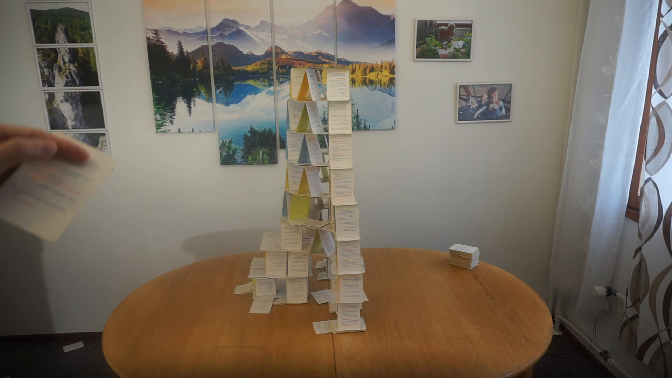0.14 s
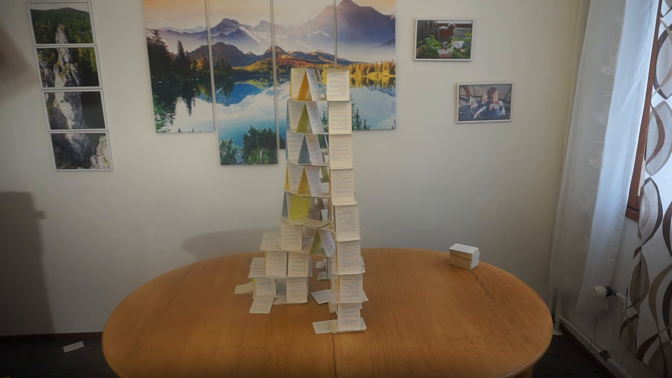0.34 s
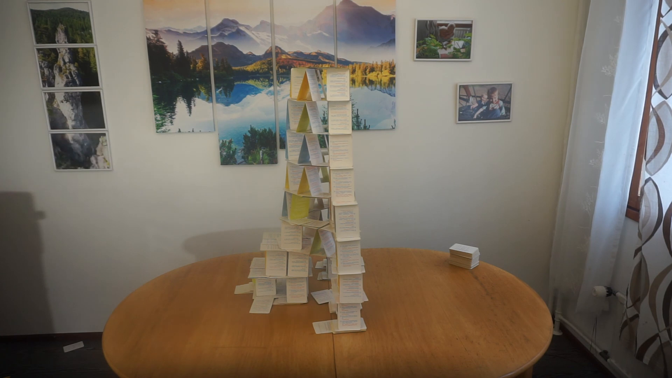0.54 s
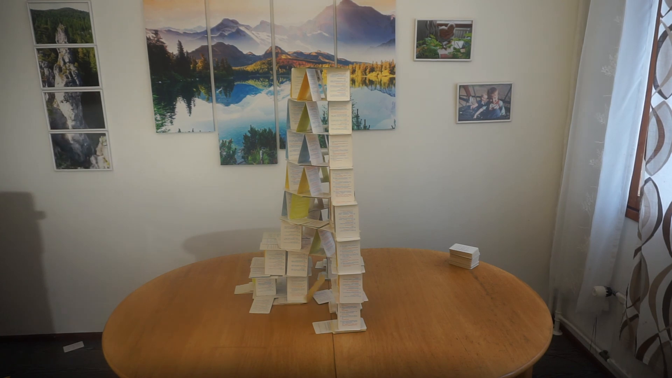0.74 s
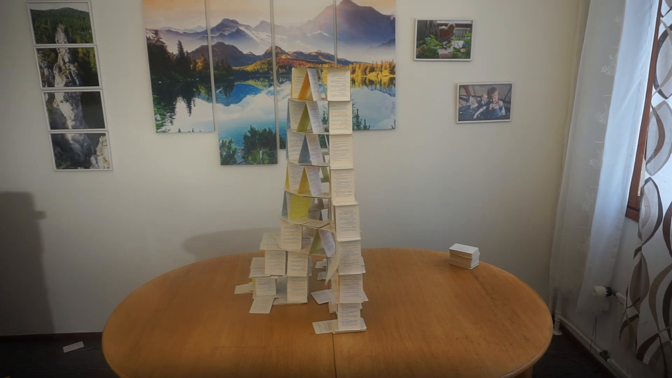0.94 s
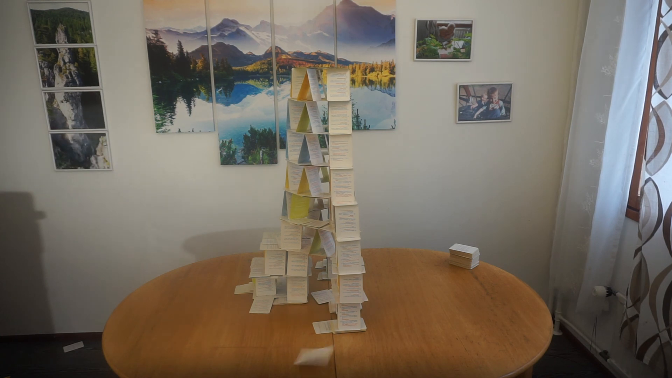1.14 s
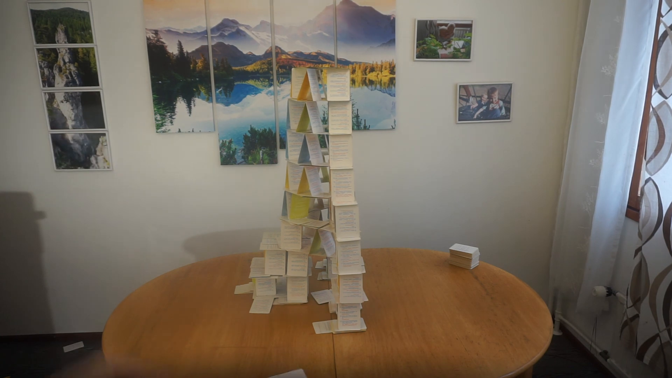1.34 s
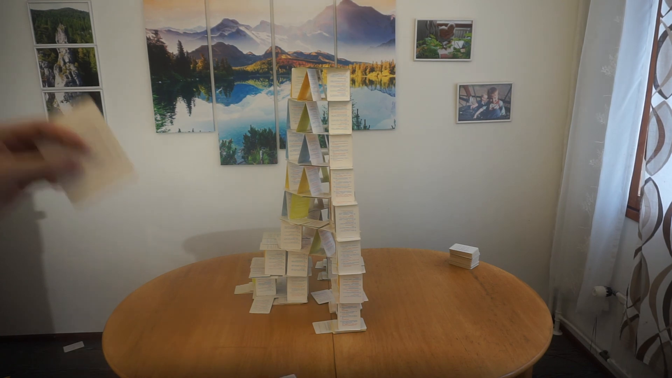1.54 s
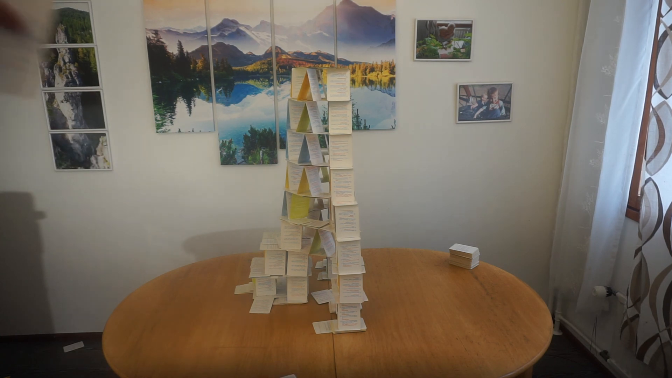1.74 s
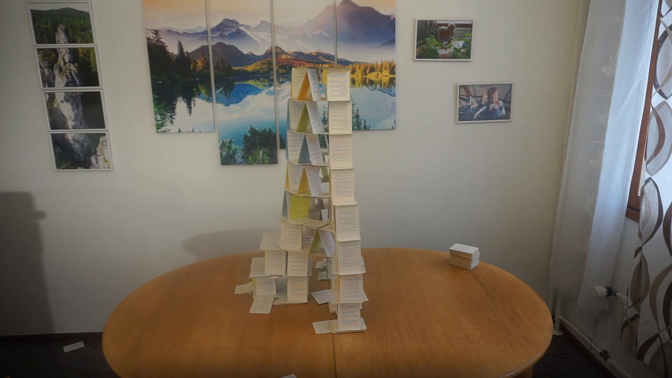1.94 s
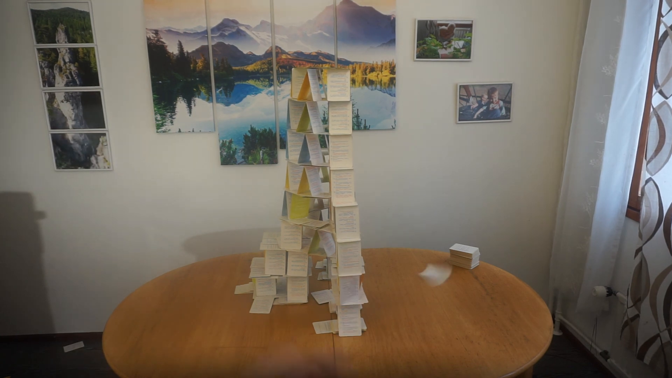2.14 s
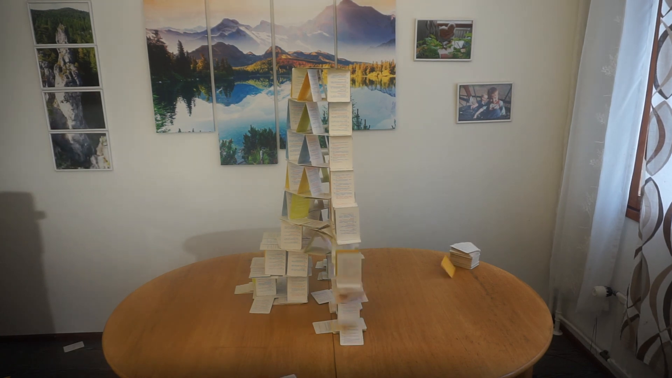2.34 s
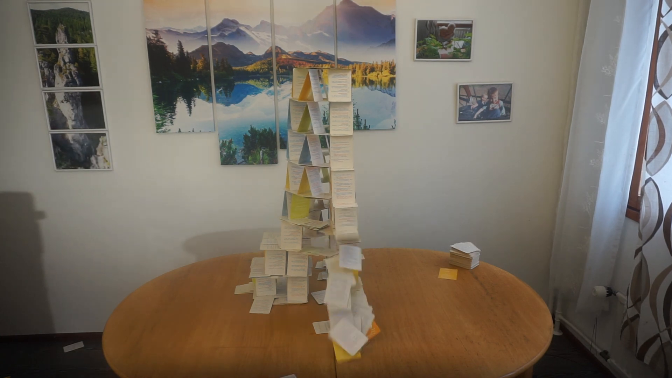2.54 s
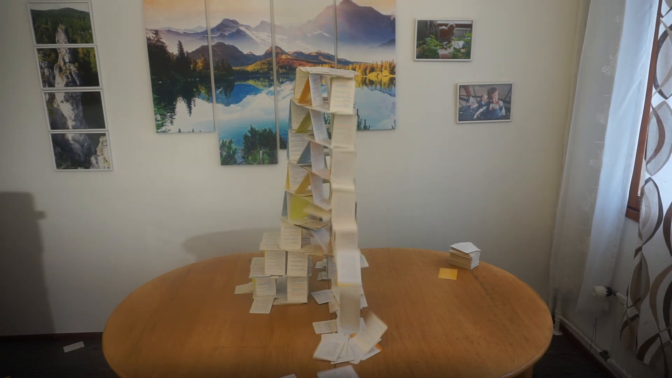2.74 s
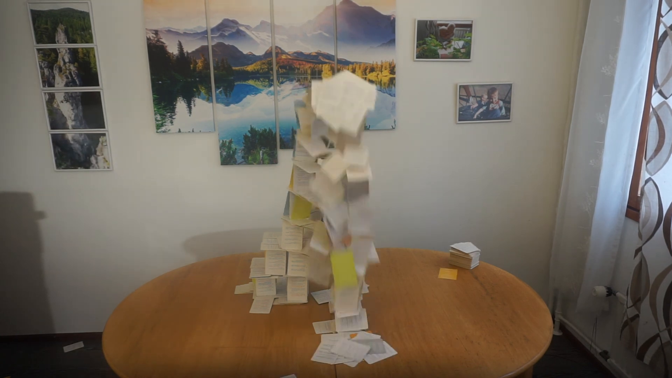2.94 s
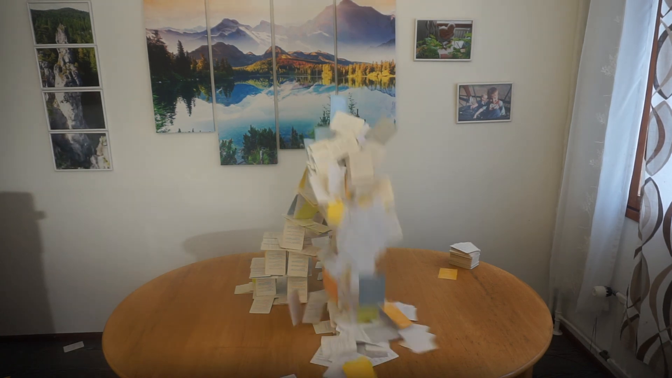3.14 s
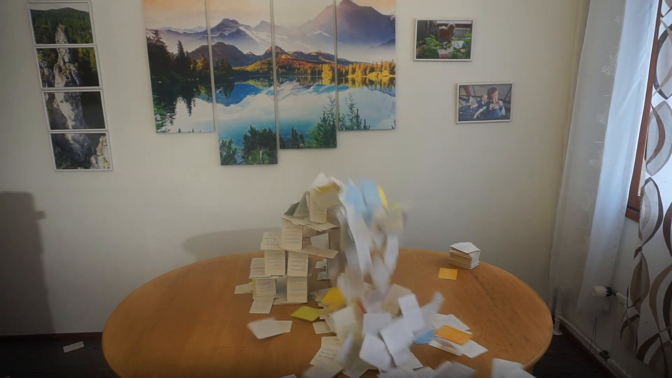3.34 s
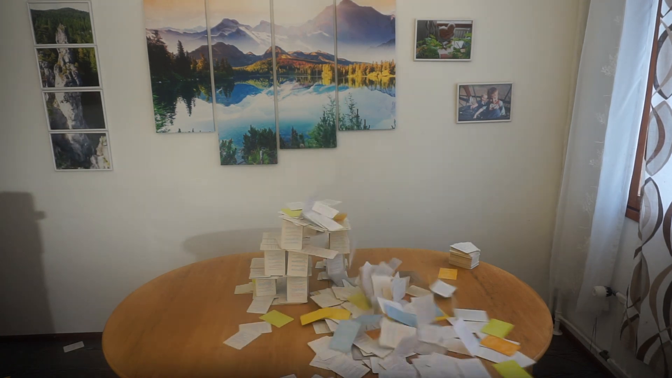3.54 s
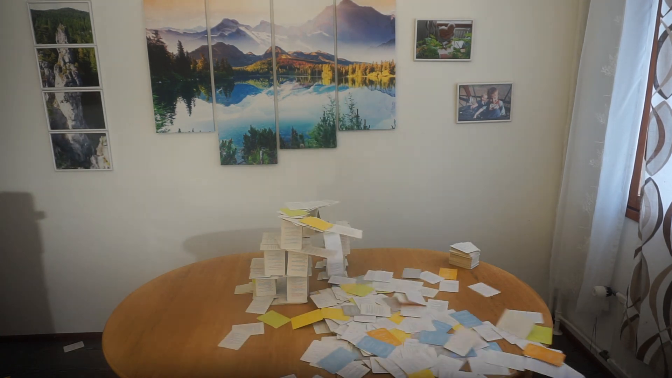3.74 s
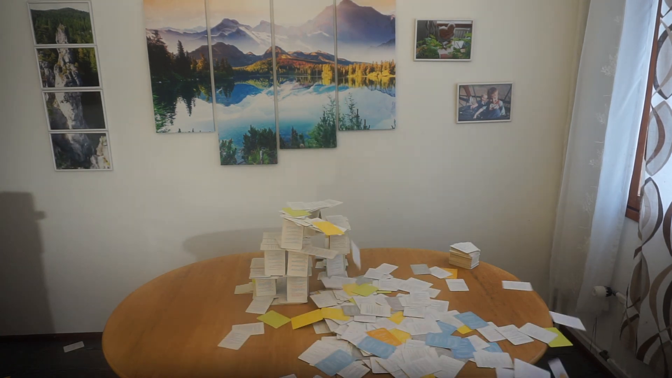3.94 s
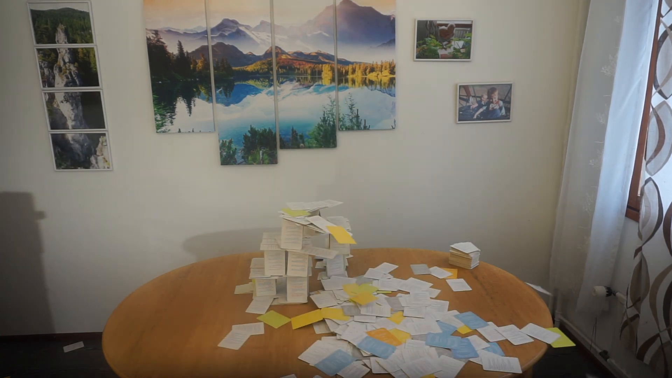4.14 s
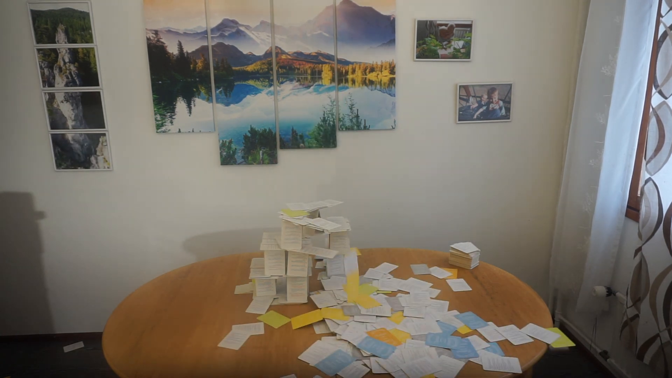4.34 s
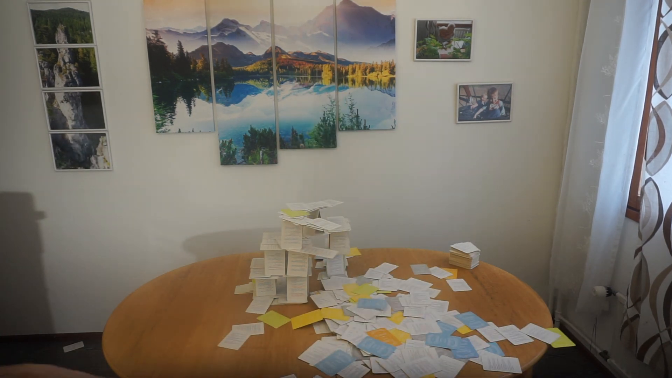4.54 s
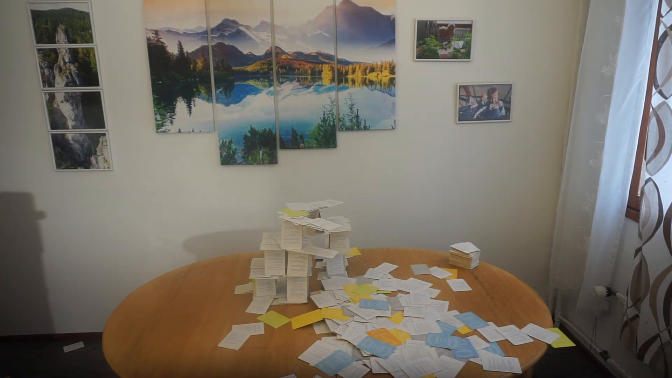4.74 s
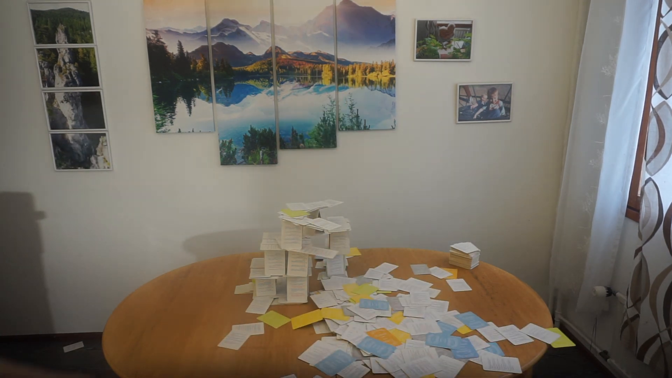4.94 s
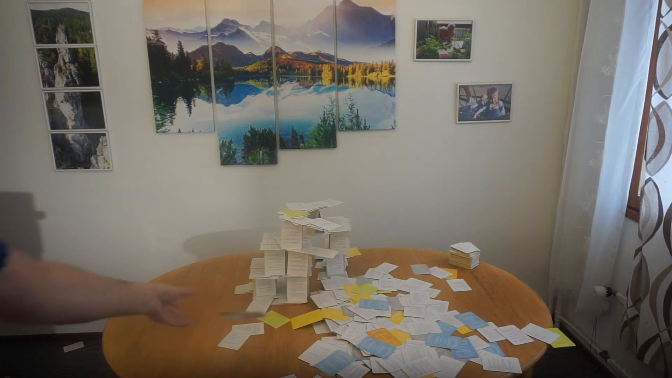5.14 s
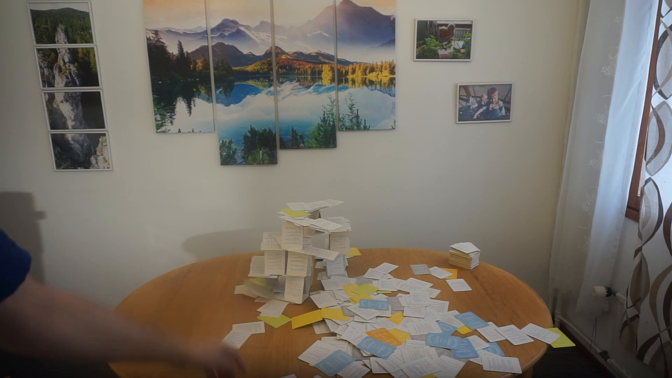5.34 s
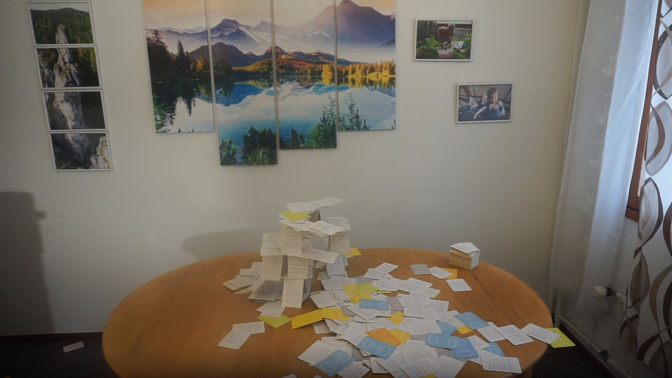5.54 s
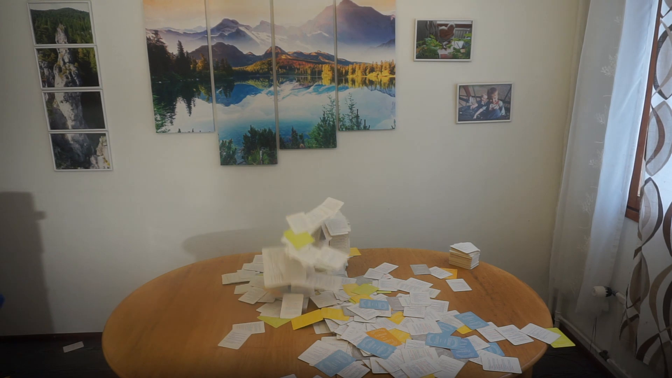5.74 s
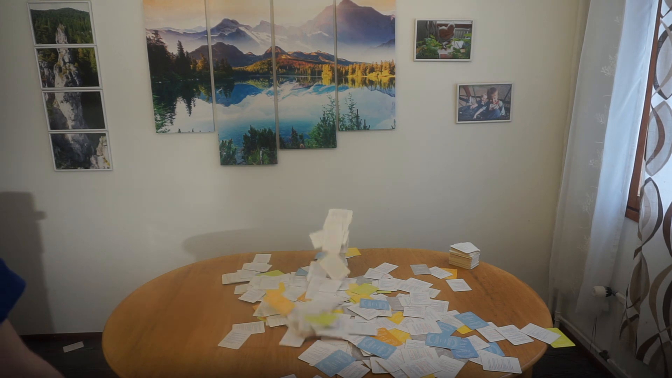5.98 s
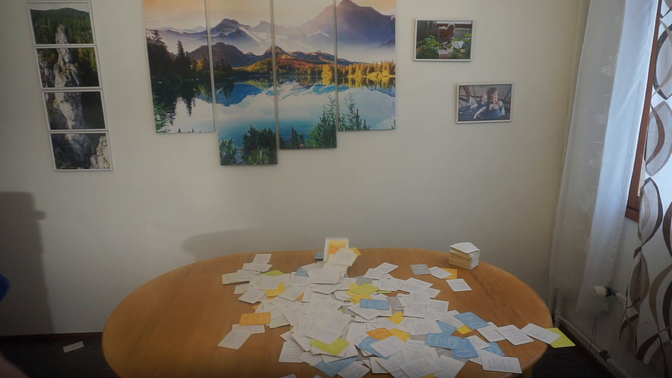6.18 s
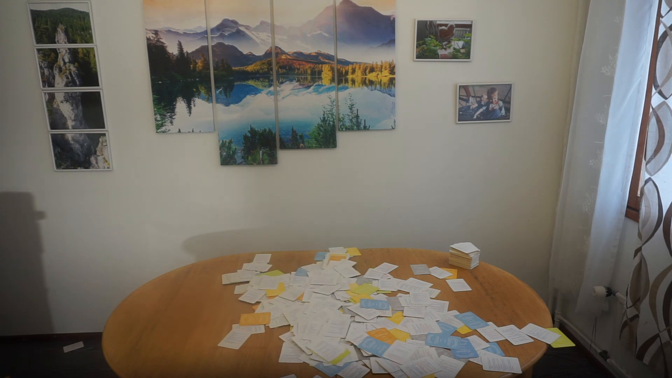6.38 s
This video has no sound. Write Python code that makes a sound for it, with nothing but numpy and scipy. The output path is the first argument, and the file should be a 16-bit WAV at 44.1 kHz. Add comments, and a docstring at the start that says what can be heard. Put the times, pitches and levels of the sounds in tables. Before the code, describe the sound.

Two sharp card snaps, a swelling papery cascade with hollow wooden knocks, then a low table thump and a smaller heap caving in.

```python
"""A faint wavering whine and room hiss, then playing cards flicked at a house of cards in a bare, ringing room.
The first card hits the wall; the second fells the tower, which pours over a wooden table and on to the floor.
A hand then knocks down the stump, with a low table thump.
Each card sound is a cluster of tiny random contacts, coloured by card and table, heard mostly through the room;
whine and thump are sines, and hiss, air pushes and rumble are shaped noise."""
import sys
import numpy as np
from scipy import signal
from scipy.fft import rfft, irfft, next_fast_len
from scipy.io import wavfile
from scipy.ndimage import uniform_filter1d, minimum_filter1d, map_coordinates

SR = 44100
rng = np.random.default_rng(int(sys.argv[2]) if len(sys.argv) > 2 else 0)


def master_out(mix):
    """Clip the mix to full scale and print it as 16-bit PCM to the path in sys.argv[1]."""
    frames = np.transpose(np.atleast_2d(mix))
    ceiling = np.clip(frames, -1, 1)
    pcm = np.round(ceiling * 32767).astype(np.int16)
    wavfile.write(sys.argv[1], SR, pcm)


N = 282681  # samples

# room hiss: (time [s], level [dB])
HISS_LEVEL = [(0, -56.5), (.5, -57), (1.8, -59), (4.4, -58), (5.15, -67), (6.4, -56)]
# hiss spectrum: (frequency [Hz], relative density [dB])
HISS_SPECTRUM = [(15, -24), (28, -12.5), (100, -8), (260, -14.5), (650, -18), (850, -13.5), (1200, -13.5),
                 (1700, -21.5), (2400, -16.5), (3300, -24.5), (11000, -25)]
# faint tones: (centre frequency [Hz], rms level [dB])
WHINE_TONES = [(834, -66), (1087, -79)]
# card on card and wood: (frequency [Hz], relative density [dB])
CARD_SPECTRUM = [(24, -63.5), (50, -37), (100, -20), (160, -16), (222, -10.5), (400, -5.5), (600, -4.5),
                 (900, -.5), (1840, -0.5), (2700, -1), (5500, -6), (9500, -9), (11000, -13.5)]
# table and room resonances: (centre [Hz], width [Hz], peak [dB])
BODY_RESONANCES = [(193, 11, 7), (227.5, 9, 9.5), (334.5, 11, 6), (423, 28, 3.5), (520, 13, 2),
                   (700, 110, 2.5), (1160, 31, 0.5), (1256, 11, 5), (1900, 9.4, -0.5)]
# room decay: (frequency [Hz], t60 [s])
ROOM_DECAY = [(150, 0.9), (400, 0.51), (1000, 0.51), (2800, 0.41), (7300, 0.25), (11000, 0.21)]
# gain of the side channel: (frequency [Hz], gain [dB])
SIDE_GAIN = [(120, -13.5), (250, -13.5), (500, -10.5), (1000, -6), (2000, -4.5), (4000, -1.5), (8000, 0)]
# stereo tilt: (frequency [Hz], left minus right [dB])
LEFT_LEAN = [(500, 0.1), (2000, -0.7), (4000, 1), (8000, 4.5), (11000, 4)]
# card leaves the fingers: (time [s], swish [dB], rise [s], decay [s], air push [dB])
FLICK_EVENTS = [(0.607, -19, 0.011, 0.012, -48.5), (2, -31, 0.0059, 0.01, -48.5)]
# two thrown cards, then the hand:
# (time [s], snap [dB], flutter [dB], flutter time [s], weight [dB], brightness [dB], ring [Hz], ring [dB])
STRIKE_EVENTS = [(.690, -6.5, -17, 0.11, 1.5, -4.5, 2420, 4),
                 (2.088, -10.5, -20.5, 0.11, -5.5, 2.5, 2150, 8),
                 (5.274, -23.5, -26, 0.062, 10.5, -2, 850, 1)]
# single cards land edge first, then flop on to their face:
# (time [s], edge [dB], weight [dB], brightness [dB], ring [Hz], flop re edge [dB])
LANDING_EVENTS = [(1.033, -37, 3.5, -3, 1290, -8), (1.164, -26.5, -1.5, -4, 905, -9),
                  (1.3, -39, 7, -4, 2280, -4.5), (1.384, -47.5, -2, 15, 2500, -9.5),
                  (2.205, -18.5, 7, -23, 2060, -11.5), (2.297, -30.5, 8.5, -2, 2400, -16),
                  (2.38, -28, 3, 2.5, 2318, -5.5), (2.473, -28, 7, 0.5, 2500, -5),
                  (2.528, -13.5, -10.5, 1.5, 3350, 2.5), (2.803, -13.5, 3, 3.5, 2640, -7),
                  (2.969, -14.5, 0, 2.5, 1870, -19.5), (3.04, -14.5, 0, 4.5, 3300, -6.5),
                  (3.252, -11, -19, 5, 2580, -23), (3.779, -18.5, 0.5, 2.5, 2700, -11),
                  (3.839, -21.5, 8, 8, 2580, -15), (3.958, -16.5, -2.5, 5.5, 1710, -2.5),
                  (4.235, -11.5, -9, 1, 2530, -6.5), (4.434, -17, -16, 3.5, 1069, -16),
                  (4.501, -19.5, -3.5, -5.5, 4230, -5.5), (5.264, -35.5, 7, 11, 874, -20),
                  (5.676, -18, -11.5, 4, 2200, -20), (5.782, -15.5, 1, -2, 550, -7),
                  (5.852, -16.5, -7.5, 6, 3070, -23), (5.976, -16, -4.5, 4.5, 2160, -3),
                  (6.198, -19.5, 3.5, 1, 2120, -29)]
# corner ticks on the wood, card stays standing: (time [s], level [dB], weight [dB], brightness [dB], ring [Hz])
TICK_EVENTS = [(1.065, -39, 0, -5, 3000), (1.465, -47.5, 21, -0.5, 8000), (1.524, -40, 4.5, 4, 645),
               (3.67, -6, -6.5, 4, 3830), (5.555, -26.5, 10.5, 4, 690)]
# first card skids, tower falls, heap spreads and spills, stump caves in, its last storey follows:
# (start [s], full flow [s], stop [s], full flow [dB], build-up [dB], weight at full flow [dB], brightness [dB])
POUR_EVENTS = [(1.199, 1.2, 1.22, -34, 2, -1, -4), (2.53, 3.0, 3.585, -21.5, 9.5, 5.5, 0),
               (3.721, 3.963, 4.2, -29, 1.5, -0.5, -1.5), (4.145, 4.255, 4.33, -23, 2.5, -5.5, -0.5),
               (5.401, 5.899, 6.042, -24, 11.5, 3, -3.5), (6.139, 6.218, 6.255, -32, -5.5, -10.5, -1.5)]
# packets drop flat with a hollow knock: (time [s], level [dB], ring [Hz], ring [dB])
KNOCK_EVENTS = [(3.162, -10.5, 740, 13.5), (3.302, -28, 1260, 21.5), (3.346, -20, 990, 22),
                (3.421, -5.5, 1010, 6), (3.895, -24, 530, 25), (3.93, -19, 1750, 12.5),
                (3.995, -23.5, 610, 23), (4.186, -12, 543, 26.5), (4.199, -17.5, 1020, 16),
                (4.356, -19, 808, 23.5), (4.393, -17, 980, 5.5), (4.525, -36, 725, 28.5),
                (4.595, -19.5, 610, 24), (4.622, -41, 634, 28), (4.748, -26, 648, 23),
                (4.8, -32.5, 620, 13)]

TOP_HZ = 11080  # band limit
SNAP_S, RECOIL_S = 0.002, 0.005  # snap or tick length, wait until the struck card flutters
EDGE_S, FLOP_AFTER_S, FLOP_S = 0.0089, 0.021, 0.018  # edge contact, wait for the flop, flop length
CARD_RING_DB, TICK_RING_DB = 7.5, 4  # a corner hardly bends the card, so it rings weakly
KNOCK_S, KNOCK_WEIGHT_DB, KNOCK_BRIGHT_DB, KNOCK_Q = 0.015, -6.5, -7.5, 3.14
ECHO_SHARE = 0.62  # amplitude of the nearest reflection
WEIGHT_DB_PER_FLOW_DB = 0.63
CUSHION_DB_PER_S = 14  # the growing heap covers the wood: pours lose weight
BUILD_POWER = 4.1  # exponent of the build-up
DRAIN_S = 0.075  # time for the flow to sink by 20 dB


def amp(db):
    """Decibels to amplitude ratio."""
    return 10 ** (np.asarray(db) / 20)


def unit(x):
    """Scale to rms 1."""
    return x / np.sqrt(np.mean(x ** 2) + 1e-20)


def along(points, hz):
    """Interpolate (frequency [Hz], value) points on a log axis."""
    f, v = np.transpose(points)
    return np.interp(np.log(hz + 1), np.log(f + 1), v)


def wobble(knots_per_s):
    """Smooth random curve through normal knots."""
    knots = rng.standard_normal(int(N * knots_per_s / SR) + 4)
    return map_coordinates(knots, [np.arange(N) * knots_per_s / SR])


def filtered(x, response):
    """Multiply the spectrum of x by a response of frequency."""
    n = x.shape[-1]
    m = next_fast_len(n + 8192)  # padded against wrap-around
    return irfft(rfft(x, m) * response(np.fft.rfftfreq(m, 1 / SR)), m)[..., :n]


def causal(gain):
    """Minimum-phase impulse response with this gain on an FFT grid, by folding the cepstrum."""
    cepstrum = irfft(np.log(np.maximum(gain, 1e-6)))
    half = len(cepstrum) // 2
    cepstrum[1:half] *= 2
    cepstrum[half + 1:] = 0
    return irfft(np.exp(rfft(cepstrum)))[:half]


def add(track, sound, s):
    """Mix a sound in at time s."""
    start = max(round(s * SR), 0)
    part = sound[..., :max(N - start, 0)]
    track[..., start:start + part.shape[-1]] += part


def noise(spectrum):
    """Independent mid and side noise, rms 1, with this spectrum."""
    return unit(filtered(rng.standard_normal((2, N)), lambda hz: amp(along(spectrum, hz))))


def contacts(n, rate_hz, spread_db, rub_db):
    """Card edges tick at random moments and sizes, over the rub of their faces; rms 1."""
    hits = (rng.random(n) < rate_hz / SR) * rng.choice([-1, 1], n)
    sizes = amp(spread_db * np.clip(rng.standard_normal(n), -2, 2))
    return unit(unit(hits * sizes) + amp(rub_db) * rng.standard_normal(n))


def tone_db(hz, weight_db, bright_db):
    """Flat landings sound heavy (low shelf), edges click brightly (high shelf)."""
    low_shelf = along([(650, 0.85), (1250, 0.28)], hz)
    high_shelf = along([(3200, 0.045), (6000, 0.9)], hz)
    return weight_db * low_shelf + bright_db * high_shelf


def slap(db, flutter_s, weight_db, bright_db, ring_hz, ring_db, q=2.75, snap_db=-6, snap_decay_s=0.0022, hold=1.74):
    """A card snaps against something, then flutters to rest, with one broad resonance of its own."""
    t, hz = np.arange(SR // 3) / SR, np.fft.rfftfreq(2048, 1 / SR)
    flutter = contacts(len(t), rate_hz=1500, spread_db=4.0, rub_db=-2.5) * np.exp(-(t / flutter_s) ** hold)
    snap = amp(snap_db) * np.exp(-t / snap_decay_s) * rng.standard_normal(len(t))
    peak = 1 / (1 + (2 * q * (hz - ring_hz) / ring_hz) ** 2)
    ring = 1 + (amp(ring_db) - 1) * peak
    # the nearest surface throws back a copy that combs the spectrum
    echo_s = rng.uniform(0.002, 0.006)
    comb = np.abs(1 + ECHO_SHARE * np.exp(2j * np.pi * hz * echo_s)) / np.hypot(1, ECHO_SHARE)
    gain = amp(db + tone_db(hz, weight_db, bright_db)) * ring * comb
    return signal.fftconvolve(flutter + snap, causal(gain))


def background():
    """Room hiss, and faint whines that waver in pitch and keep fading in and out."""
    t = np.arange(N) / SR
    level_db = np.interp(t, *np.transpose(HISS_LEVEL)) + 0.26 * wobble(2.5)
    out = amp(level_db) * noise(HISS_SPECTRUM)
    for hz, db in WHINE_TONES:
        phase = 2 * np.pi * np.cumsum(hz + 6 * wobble(22)) / SR
        swell = unit(amp(7 * np.tanh(2 * wobble(26))))
        out[0] += amp(db) * swell * np.sqrt(2) * np.sin(phase)  # mid only
    return out


def swishes(weight_db, bright_db):
    """The thrown card slides off the fingertips: a short noise stroke."""
    out, t = np.zeros(N), np.arange(SR // 5) / SR
    for s, db, rise_s, decay_s, _ in FLICK_EVENTS:
        stroke = (1 - np.exp(-(t / rise_s) ** 2)) * np.exp(-t / decay_s)
        add(out, amp(db) * stroke * rng.standard_normal(len(t)), s)
    return filtered(out, lambda hz: amp(tone_db(hz, weight_db, bright_db)))


def puffs(lag_s, sigma_s):
    """The swing of the hand pushes a soft wave of air at the microphone: Gaussian swells of low noise."""
    t = np.arange(N) / SR
    swell = sum(amp(db) * np.exp(-((t - s - lag_s) / sigma_s) ** 2 / 2) for s, *_, db in FLICK_EVENTS)
    return swell * noise([(15, -29.5), (35, -2.5), (65, -14), (150, -10.5), (600, -40.5), (2000, -100)])


def strikes():
    """A hard hit is a short snap; the card recoils and flutters on."""
    out = np.zeros(N)
    for s, snap_db, flutter_db, flutter_s, *colour in STRIKE_EVENTS:
        add(out, slap(snap_db, SNAP_S, *colour), s)
        add(out, slap(flutter_db, flutter_s, *colour), s + RECOIL_S)
    return out


def landings():
    """A falling card touches with its edge, tips over and flops down."""
    out = np.zeros(N)
    for s, db, weight_db, bright_db, ring_hz, flop_db in LANDING_EVENTS:
        colour = weight_db, bright_db, ring_hz, CARD_RING_DB
        add(out, slap(db, EDGE_S, *colour), s)
        add(out, slap(db + flop_db, FLOP_S, *colour), s + FLOP_AFTER_S)
    return out


def ticks():
    """A corner gives a bare snap with no long flutter."""
    out = np.zeros(N)
    for s, db, *colour in TICK_EVENTS:
        add(out, slap(db, SNAP_S, *colour, TICK_RING_DB), s)
    return out


def flow_db(s, start, full, stop, build_db):
    """A pour re full flow: moves from -build_db to 0 ever faster, holds, then runs dry ever faster."""
    progress = np.clip((s - start) / max(full - start, 1e-3), 0, 1)
    drain = np.maximum(s - stop, 0) / DRAIN_S
    return build_db * (progress ** BUILD_POWER - 1) - 20 * drain ** 2


def cascade(pour, patchy_db, falls_per_s, settle_s, slide):
    """Cards land at random, each with a short patter, over the steady sliding of the heap."""
    start, full, stop, db, build_db, weight_db, bright_db = pour
    n = int((stop - start + 0.5) * SR)
    falls = (rng.random(n) < falls_per_s / SR) * rng.uniform(0.31, 1, n)
    patter_power = signal.lfilter([1], [1, -np.exp(-2 / (settle_s * SR))], falls)
    rustle = contacts(n, rate_hz=700, spread_db=4.0, rub_db=-9)
    stream = unit(rustle * np.sqrt(patter_power + slide))
    # each clump of cards rings with its own colour
    hz, t, z = signal.stft(stream, SR, nperseg=256)
    patches = uniform_filter1d(rng.standard_normal(z.shape), size=5, axis=0)
    patches = unit(uniform_filter1d(patches, size=6, axis=1))
    flow = flow_db(start + t, start, full, stop, build_db)
    weight = weight_db + WEIGHT_DB_PER_FLOW_DB * flow - CUSHION_DB_PER_S * (start + t - full)
    gain = amp(db + flow + tone_db(hz[:, None], weight, bright_db) + patchy_db * patches)
    out = np.zeros(N)
    add(out, signal.istft(z * gain, SR, nperseg=256)[1][:n], start)
    return out


def knocks():
    """A packet lands all at once, dull and with a strong low ring."""
    out = np.zeros(N)
    for s, db, ring_hz, ring_db in KNOCK_EVENTS:
        add(out, slap(db, KNOCK_S, KNOCK_WEIGHT_DB, KNOCK_BRIGHT_DB, ring_hz, ring_db, KNOCK_Q), s)
    return out


def table_thump(s, db, hz, t60_s, rumble_db, rumble_t60_s):
    """The hand's blow sets the table top humming and its frame rumbling."""
    t = np.maximum(np.arange(N) / SR - s, 0)
    hum = amp(db - 60 * t / t60_s) * np.sin(2 * np.pi * hz * t)
    rumble = noise([(15, -30), (50, -8), (100, 2.0), (170, -0.5), (500, -52), (2000, -100)])
    rumble *= amp(rumble_db - 60 * t / rumble_t60_s)
    onset = 1 - np.exp(-t / 0.026)
    return onset * (np.outer([1, 0], hum) + rumble)


def in_room(x, direct_db, slant):
    """Mid and side: straight path plus a diffuse field that stores each band's energy and leaks it away."""
    grid = dict(fs=SR, nperseg=512, noverlap=384)
    hz, t, z = signal.stft(x, **grid)
    keep = amp(-60 * t[1] / along(ROOM_DECAY, hz)) ** 2  # energy kept per frame
    # leaky integrator, two frames late
    stored = np.array([signal.lfilter([0, 0, 1 - k], [1, -k], np.abs(band) ** 2) for k, band in zip(keep, z)])
    scatter = signal.stft(rng.standard_normal((2, N)), **grid)[2]
    field = signal.istft(scatter / np.std(scatter) * np.sqrt(stored), **grid)[1][:, :N]
    # the straight sound reaches the right port a moment before the left
    straight = np.array([x, -slant * np.gradient(x)])
    return (field + amp(direct_db) * straight) / np.hypot(1, amp(direct_db))


def cards():
    """All contacts sound through the stiff card and the table under it, into the room."""
    hz = np.fft.rfftfreq(16384, 1 / SR)
    boom_db = sum(db / (1 + (2 * (hz - centre) / width) ** 2) for centre, width, db in BODY_RESONANCES)
    top_cut_db = 4.3 * np.clip(hz / TOP_HZ - 1, 0, 1)
    body = causal(unit(amp(along(CARD_SPECTRUM, hz) + boom_db - top_cut_db)))
    blows = swishes(weight_db=7.5, bright_db=6) + strikes() + landings() + ticks() + knocks()
    for pour in POUR_EVENTS:
        blows += cascade(pour, patchy_db=2.5, falls_per_s=70, settle_s=0.0046, slide=0.2)
    return signal.fftconvolve(in_room(blows, direct_db=-3.0, slant=1.0), body[None], axes=1)[:, :N]


def scene():
    """Two close microphone ports: alike in the bass, increasingly unrelated in the treble."""
    thump = table_thump(s=5.275, db=-36, hz=212, t60_s=0.88, rumble_db=-54.0, rumble_t60_s=7.2)
    mid, side = cards() + puffs(lag_s=0.041, sigma_s=0.037) + thump + background()
    side = filtered(side, lambda hz: amp(along(SIDE_GAIN, hz)))
    left_right = np.array([mid + side, mid - side])
    return filtered(left_right, lambda hz: amp(np.outer([0.5, -0.5], along(LEFT_LEAN, hz))))


def record(dry, ceiling=0.52):
    """A look-ahead limiter holds down the peaks of both channels alike; a steep low-pass cuts above TOP_HZ."""
    needed = np.minimum(1, ceiling / (np.abs(dry).max(axis=0) + 1e-9))
    gain = uniform_filter1d(minimum_filter1d(needed, size=129), size=129)
    return filtered(dry * gain, lambda hz: 1 / np.sqrt(1 + (hz / TOP_HZ) ** 300))


dry = scene()
out = record(dry)
master_out(out)
```